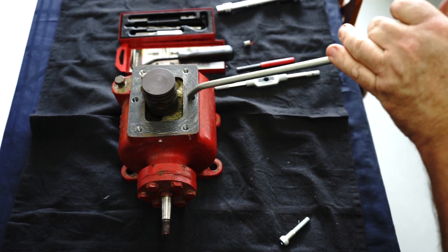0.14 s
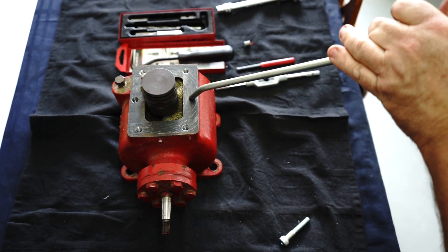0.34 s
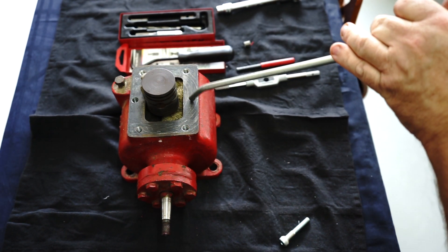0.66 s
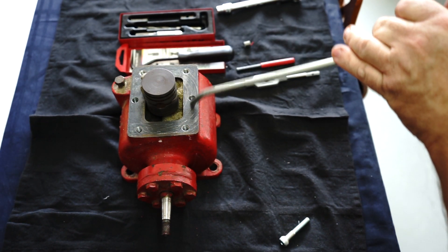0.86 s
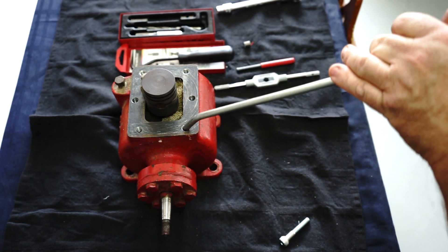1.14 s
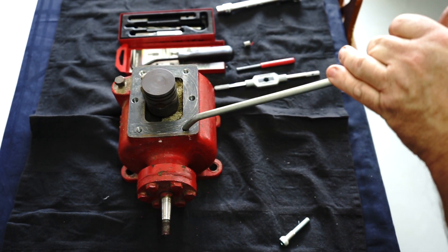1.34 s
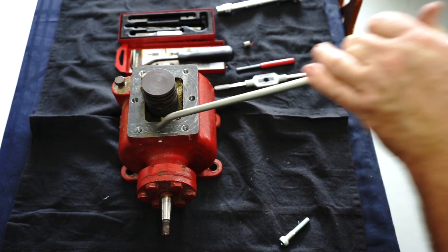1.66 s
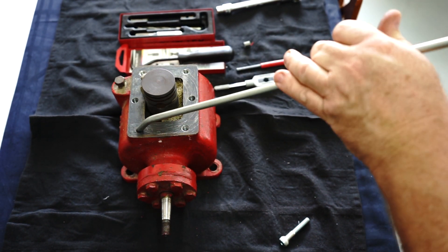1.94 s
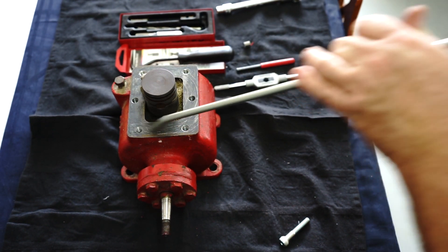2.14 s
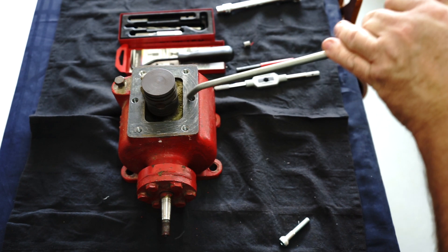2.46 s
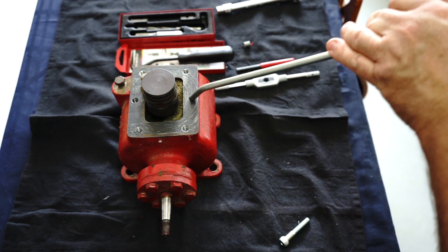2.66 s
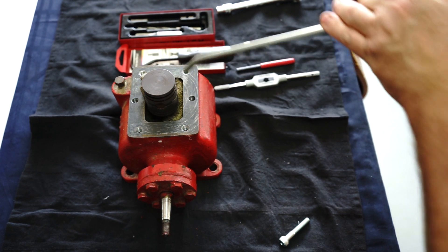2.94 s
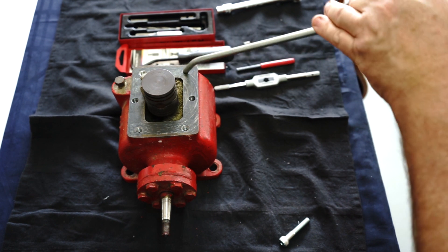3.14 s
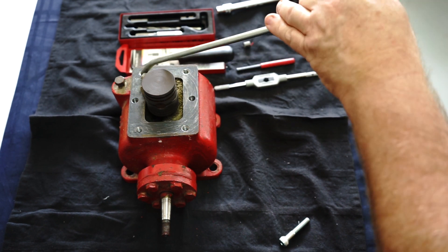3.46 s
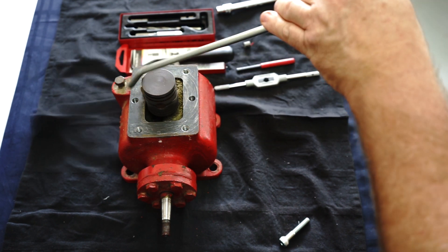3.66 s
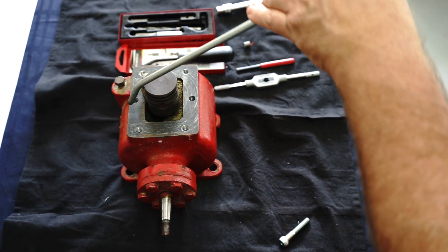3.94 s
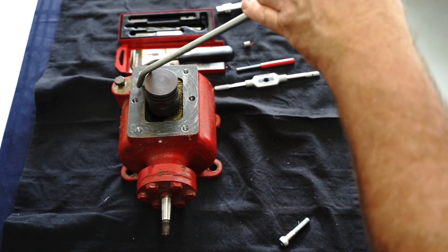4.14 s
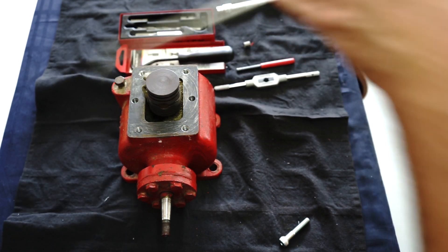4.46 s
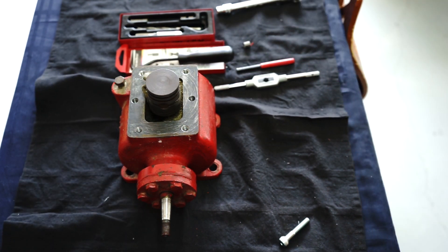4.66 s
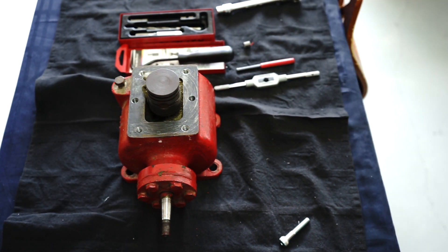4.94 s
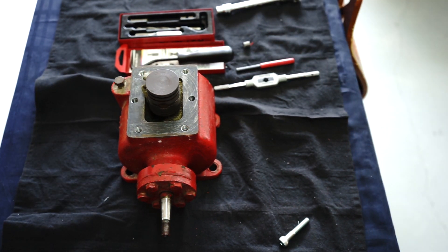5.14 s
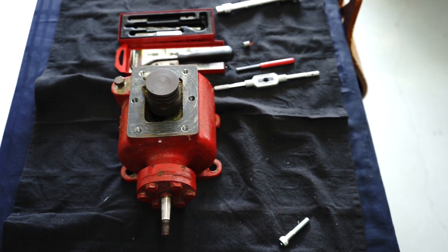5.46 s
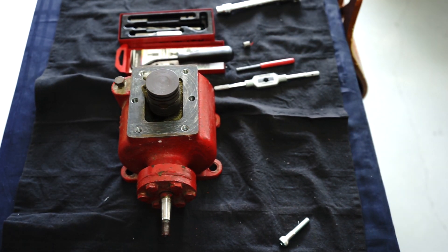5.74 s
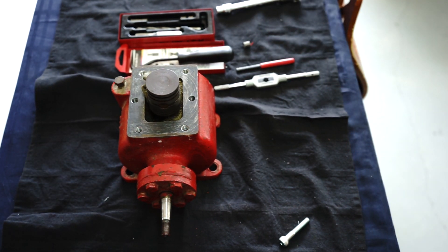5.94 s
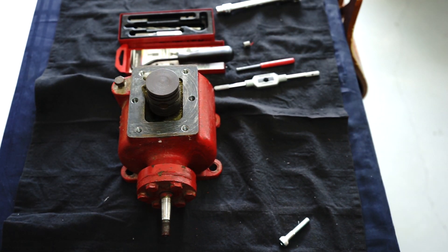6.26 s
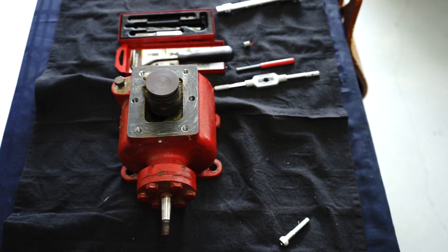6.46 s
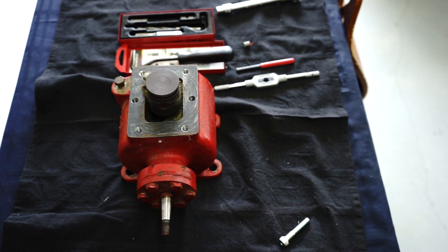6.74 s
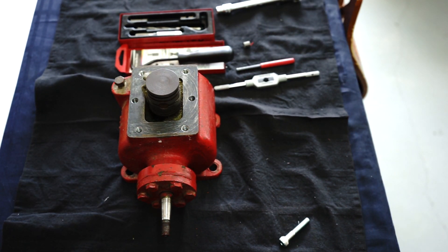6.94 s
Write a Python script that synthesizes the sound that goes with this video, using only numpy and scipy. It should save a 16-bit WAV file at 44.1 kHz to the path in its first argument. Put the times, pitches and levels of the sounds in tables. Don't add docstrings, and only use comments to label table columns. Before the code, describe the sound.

Fierce, fluttering air blasts whistle and roar across metal openings in a hard-walled workshop, followed by quiet cloth rustle, hose groans and faint knocks.

```python
import sys
import numpy as np
from scipy import signal
from scipy.io import wavfile
from scipy.ndimage import uniform_filter1d

SR = 44100
rng = np.random.default_rng(int(sys.argv[2]) if len(sys.argv) > 2 else 0)


def generate_wav(sig):
    pcm = np.round(np.clip(np.atleast_2d(sig).T, -1, 1) * 32767).astype(np.int16)
    wavfile.write(sys.argv[1], SR, pcm)


def volts_from_decibels(level):
    exponent = np.asarray(level, float) / 20
    return 10 ** exponent


N = 312916
BLOWING = int(4.5 * SR)
MOVE_S = 0.0161

# start_s, length_s, first_hz, last_hz, peak_db
CHIRPS = [
    (0.075, 0.031, 4350, 4715, -11.5),
    (0.887, .058, 4960, 3920, -7.5),
    (1.077, 0.024, 4090, 4520, -11),
    (1.731, .066, 4200, 5107, -5.5),
    (2.147, 0.044, 5044, 4060, -4.5),
    (2.964, .036, 4055, 4270, -16.5),
    (3.294, 0.039, 4210, 4500, -8.5),
    (3.598, 0.022, 4450, 4050, -17.5),
    (4.074, 0.028, 4408, 4460, -19),
]


def rms_one(x):
    return x / np.sqrt(np.mean(x ** 2) + 1e-20)


def in_time(rows, size=N):
    s, *columns = np.transpose(rows)
    t = np.arange(size) / SR
    return [np.interp(t, s, c) for c in columns]


def at_hz(points, hz):
    points_hz, values = np.array(points).T[:2]
    return np.interp(np.log(hz), np.log(points_hz), values)


def drift(rate_hz, size=N):
    settle = 4000
    r = np.exp(-2 * np.pi * rate_hz / SR)
    wander = signal.lfilter([1], [1, -2 * r, r * r], rng.standard_normal(size + settle))
    return rms_one(wander[settle:])


def ring(clicks, hz, t60):
    r = volts_from_decibels(-60 / (max(t60, .002) * SR))
    w = 2 * np.pi * hz / SR
    return signal.lfilter([0, np.sin(w)], [1, -2 * r * np.cos(w), r * r], clicks + 1e-18)


def bank(gain, size=N):
    # pitch_hz, side_minus_mid_db
    spread = [(60, -8.5), (180, -23.5), (550, -20), (1650, -11.5), (5000, -3), (15000, -8.5)]
    # pitch_hz, left_minus_right_db
    tilt = [(60, 0), (240, -1), (950, -1.5), (3770, -2), (15000, 1.5)]
    edges_hz = np.geomspace(28, 17500, 20)
    out, white = 0, rng.standard_normal((2, 2, size))
    for k, (low, high) in enumerate(zip(edges_hz, edges_hz[1:])):
        band = signal.butter(2, [low, high], "band", fs=SR, output="sos")
        mid, side = signal.sosfilt(band, white[k % 2])
        hz = np.sqrt(low * high)
        side = side * volts_from_decibels(at_hz(spread, hz))
        lean = volts_from_decibels(at_hz(tilt, hz) / 2)
        out = out + gain(hz) * np.array([lean * (mid + side), (mid - side) / lean])
    return out


def narrow(hz, width_hz, steady=0., size=N):
    carrier = np.exp(2j * np.pi * np.cumsum(hz * np.ones(size)) / SR)
    wander = drift(width_hz, size=size) + 1j * drift(width_hz, size=size)
    return rms_one(np.real(carrier * (steady + wander)))


def gate(s, length, size=BLOWING):
    hold = max(length, MOVE_S)
    corners_s = s - MOVE_S / 2 + np.array([0, MOVE_S, hold, hold + MOVE_S])
    return np.interp(np.arange(size) / SR, corners_s, [0, 1, 1, 0])


def valve(x):
    opening = np.interp(np.arange(BLOWING) / SR, [4.41, 4.46], [1, 0])
    return np.pad(x * opening, [(0, 0), (0, N - BLOWING)])


def nozzle():
    # time_s, hiss_db
    flow = [(0, -21), (.3, -17.5), (.85, -15), (1.2, -18), (1.3, -17.5), (1.38, -22), (1.5, -16.5),
            (1.9, -18.5), (2.07, -26.5), (2.14, -24.5), (2.55, -22), (2.8, -21), (3.2, -22), (3.6, -20.5),
            (3.64, -26.5), (3.95, -25), (4.44, -25)]
    # start_s, length_s, relative hiss_db, relative roar_db, drone_db
    dips = [(0.0, 0.49, -0.14, 3, -62.5), (0.046, 0.14, -6.5, 4.5, -45), (0.634, 0.063, -2.6, 4.5, -44),
            (0.887, .23, -12.5, 2.9, -44.5), (1.563, .17, -6.5, 4.5, -46),
            (1.745, 0.082, -12.5, -5.5, -41.5), (1.83, 0.14, -2.2, 0.1, -53.5),
            (2.116, 0.047, -1.2, 2.2, -41), (2.156, 0.37, -11, -6, -49.5), (2.211, 0.11, 3.3, 9, -57.5),
            (2.445, 0.071, 0.5, 12, -69), (2.722, .1, -2, -1, -60), (2.857, .19, -4.5, 4.5, -53.5),
            (3.111, 0.034, -5.5, -3, -58), (3.202, .06, -2.5, -1, -52), (3.314, .025, -2.5, -15, -41),
            (3.372, 0.054, -4.5, -1, -60), (3.577, 0.039, -2.7, 0.5, -50), (3.687, 0.28, 1.3, 6, -62),
            (3.986, 0.32, -3.5, 1.5, -53), (4.328, 0.084, -1.8, 4.4, -51)]
    # start_s, length_s, relative hiss_db, relative splash_db
    splashes = [(0.0, .05, 1.1, 8.5), (0.183, 0.033, 0.5, 8), (0.497, 0.058, -0.8, 3.5),
                (0.631, 0.073, 2, 3), (2.102, 0.061, 4, 5.5), (2.193, 0.036, 2.2, 7), (2.45, 0.059, 2.5, 0),
                (2.511, 0.065, 3, 7), (2.657, 0.039, 4, 1.5), (2.837, 0.029, 4.5, 1.5),
                (2.921, 0.078, 2, 3), (3.062, 0.023, 3, 12), (3.177, 0.033, 5, -2.5),
                (3.271, 0.033, -0.8, 9.5), (3.342, .1, -0.5, 10), (3.712, .26, -0.4, 3),
                (4.057, 0.034, -0.5, 14.5), (4.296, 0.027, 0, 13)]
    usual_splash_db, splash_spared = -7, 0.45
    usual_roar_db, roar_follows = -35, .3

    flow_db, = in_time(flow, size=BLOWING)
    muffle_db, swell_db, drone = sum(gate(s, n) * np.array([[hiss_db], [roar_db], [volts_from_decibels(drone_db)]])
                                     for s, n, hiss_db, roar_db, drone_db in dips)
    lift_db, splash_db = sum(gate(s, n) * np.array([[hiss_db], [edge_db]])
                             for s, n, hiss_db, edge_db in splashes)
    hiss_db = flow_db + muffle_db + lift_db
    splash_db = usual_splash_db + splash_db - splash_spared * muffle_db
    roar_db = usual_roar_db + roar_follows * (flow_db - flow_db.mean()) + swell_db - hiss_db
    return hiss_db, splash_db, roar_db, drone


def jet():
    zones_hz = [11000, 6200, 1800, 600]
    # pitch_hz, level_db per Hz
    jet_colour = [(30, -44.5), (59, -33), (168, -40), (330, -22), (800, -20), (3230, -10), (5310, -0.5),
                  (15500, 0.74)]
    drone_hz, drone_width_hz = 310, 79

    hiss_db, splash_db, roar_db, drone = nozzle()
    roar_shift_db = roar_db + 15.0
    cloth_db = 5.4 * gate(3.68, 0.3)
    bass_shift_db = 1.115 * roar_shift_db - 4.5 + cloth_db
    shifts_db = [0, splash_db + 4.5, roar_shift_db, bass_shift_db]
    gust = drift(9.0, size=BLOWING)
    flutter = [drift(27.0, size=BLOWING), drift(26.0, size=BLOWING)]

    def gain(hz):
        place = np.interp(-np.log(hz), -np.log(zones_hz), np.arange(4))
        k = min(int(place), 2)
        shift_db = (k + 1 - place) * shifts_db[k] + (place - k) * shifts_db[k + 1]
        unrest_db = 0.99 * gust + 2.0 * flutter[int(hz) % 2]
        return volts_from_decibels(at_hz(jet_colour, hz) + hiss_db + shift_db + unrest_db)

    drone = drone * volts_from_decibels([[-.8], [.8]]) * volts_from_decibels(2.2 * drift(10.5, size=BLOWING))
    middle = narrow(drone_hz, drone_width_hz, size=BLOWING)
    sides = narrow(drone_hz, drone_width_hz, size=BLOWING) * [[1], [-1]]
    drone *= middle + .3 * sides
    return valve(volts_from_decibels(6.5) * bank(gain, size=BLOWING) + drone)


def column(rows, width_hz):
    t = np.arange(BLOWING) / SR
    starts, _, pitches = np.transpose(rows)[:3]
    row = np.maximum(np.searchsorted(starts, t + MOVE_S / 2) - 1, 0)
    hz = uniform_filter1d(pitches[row], size=500)
    level = sum(gate(s, n) * volts_from_decibels(np.interp(t, [s, s + n], [first_db, last_db]))
                for s, n, _, first_db, last_db in rows)
    middle = narrow(hz, width_hz, size=BLOWING)
    sides = narrow(hz, width_hz, size=BLOWING) * [[1], [-1]]
    return level * (middle + 0.5 * sides)


def hole():
    # start_s, length_s, pitch_hz, first_db, last_db
    roars = [(0.0, .06, 4700, -16, -27), (.06, 0.15, 4580, -18, -21.5), (.2, 0.019, 4710, -21.5, -23),
             (.89, 0.17, 4500, -21.5, -18.5), (1.1, 0.059, 4405, -16.5, -23.5),
             (1.2, 0.11, 8660, -18.5, -22), (1.43, .11, 8600, -15, -19), (1.57, 0.058, 4220, -21, -29.5),
             (1.625, 0.13, 4382, -13, -17), (1.79, 0.15, 4744, -20.5, -25), (2.18, 0.1, 4540, -15, -22.5),
             (2.44, 0.028, 4450, -16.5, -28.5), (2.51, 0.055, 4725, -15, -21),
             (2.89, .14, 4340, -18.5, -20.5), (3.055, 0.031, 4715, -10.5, -34),
             (3.245, .115, 4372, -13, -15.5), (3.36, 0.076, 5350, -11, -23.5),
             (3.595, 0.047, 4250, -21, -25), (4.03, .07, 4870, -22, -19), (4.11, .17, 4543, -24, -26),
             (4.295, 0.096, 5120, -12.5, -30)]
    # start_s, length_s, pitch_hz, first_db, last_db
    clear_notes = [
        (.06, 0.12, 4540, -15.5, -26.5),
        (.93, 0.13, 4600, -21, -28),
        (1.1, 0.05, 4460, -12.5, -30),
        (1.69, 0.045, 4270, -12.5, -9),
        (1.79, .12, 5102, -9, -19),
        (2.18, 0.18, 4910, -13, -32),
        (2.93, .04, 4097, -28.5, -22),
        (4.08, .11, 4500, -24, -35),
        (4.33, 0.083, 4623, -28, -27),
    ]
    yielding_db = -5.0 * sum(gate(s, n) for s, n, *_ in CHIRPS)
    level = volts_from_decibels(-3.5 + yielding_db + 1.4 * drift(30.0, size=BLOWING))
    return valve(level * (column(roars, width_hz=510.0) + column(clear_notes, width_hz=95)))


def chirps():
    # peak place (share of length), start_db, end_db, glide power
    going_in, coming_out = (0.07, -1, -16.5, 1.5), (0.57, -8.5, -4, 1)
    out, t = np.zeros(N), np.arange(N) / SR
    fray_hz = 50.0 * drift(200.0)
    wobble = 1.7 + .65 * drift(80.0)
    for s, length, first_hz, last_hz, peak_db in CHIRPS:
        peak, start_db, end_db, power = going_in if last_hz < first_hz else coming_out
        span = slice(int(s * SR) + 1, int((s + length) * SR))
        u = (t[span] - s) / length
        hz = first_hz + (last_hz - first_hz) * u ** power + fray_hz[span]
        phase = 2 * np.pi * np.cumsum(hz) / SR
        edges = np.clip(np.minimum(u, 1 - u) * length / 0.001, 0, 1)
        level = volts_from_decibels(peak_db + np.interp(u, [0, peak, 1], [start_db, 0, end_db]))
        out[span] += level * edges * (np.sin(phase) + volts_from_decibels(-23.0) * np.sin(2 * phase))
    return out * wobble * volts_from_decibels(2.0)


def shop(x):
    # pitch_hz, t60_s
    shop_t60 = [(100, 1), (1000, 0.55), (5000, 0.46), (14000, 0.29)]
    t = np.arange(SR // 2) / SR
    echoes = bank(lambda hz: volts_from_decibels(-60 * t / at_hz(shop_t60, hz)), size=len(t))
    echoes = echoes * np.clip(t / .003, 0, 1)
    echoes /= np.sqrt(np.sum(echoes ** 2) / 2)
    return signal.fftconvolve(x[None], echoes, axes=1)[:, :N]


def background():
    # pitch_hz, level_db per Hz
    room_tone = [(15, -35), (25, -6), (60, 2.5), (309, -7), (3180, -21), (4370, -16), (5540, -18.5),
                 (14000, -26)]
    # time_s, level_db
    handling = [
        (4.65, -77),
        (4.8, -64.5),
        (5.15, -70),
        (5.96, -72),
        (6.33, -69),
        (6.43, -46.5),
        (6.56, -67.5),
        (6.84, -46.5),
        (7.09, -52),
    ]
    air_db = -53
    rumble_level_db, rumble_lag_s = -2.5, 0.24
    leak_hz, leak_width_hz, leak_db, leak_ends_s = 4350, 140, -76.5, 6.5
    hum_hz, hum_width_hz, hum_db, hum_turn_s = 61.5, 10.5, -66, 1.45

    masked = 4 * SR
    rustle_db = in_time(handling)[0][masked:]
    lag = int(rumble_lag_s * SR)
    rumble_db = rumble_level_db + uniform_filter1d(rustle_db, size=2 * lag, origin=lag - 1)
    patchy = drift(5.4, size=N - masked)

    def gain(hz):
        rumble = np.interp(np.log(hz), np.log([250, 500]), [1, 0])
        still = np.interp(np.log(hz), np.log([2000, 4000]), [0, 1])
        rustle = 1 - rumble - still
        level_db = rumble * (rumble_db + 21.5) + rustle * (rustle_db + 22.5) + still * air_db
        return volts_from_decibels(at_hz(room_tone, hz) + level_db + 1.0 * patchy)

    t = np.arange(N) / SR
    bleeding = np.interp(t, [leak_ends_s - .2, leak_ends_s + 0.11], [1, 0])
    leak = volts_from_decibels(leak_db) * narrow(leak_hz, leak_width_hz) * bleeding
    running = np.interp(t, [hum_turn_s, hum_turn_s + .2], [1, 0])
    hum = volts_from_decibels(hum_db) * narrow(hum_hz, hum_width_hz, steady=1.5) * running
    room = np.pad(bank(gain, size=N - masked), [(0, 0), (masked, 0)])
    return room + leak + hum


def knocks():
    # start_s, ring_hz, thud_db, clack_db, tick_db
    blows = [(4.734, 585, -71, -58, -75.5), (5.124, 395, -64, -70.5, -79.5), (5.589, 450, -79, -75, -81.5),
             (6.122, 399, -76.5, -74, -57), (6.152, 400, -53.5, -61, -76), (6.194, 346, -76, -74, -65),
             (6.229, 623, -66.5, -60.5, -76), (6.367, 602, -43, -46.5, -59), (6.404, 640, -43, -70.5, -58),
             (6.657, 1193, -46, -36.5, -38.5), (6.733, 326, -47, -53, -51), (6.808, 330, -33.5, -32, -55),
             (6.901, 739, -33, -35, -47.5), (7.049, 204, -49, -48, -53)]
    # pitch_hz, level_db, t60_s
    gun_modes = [(1200, -5.5, .02), (2900, 6, .02), (3900, -2, .006), (5300, -2.5, .004), (7700, 1.5, .006),
                 (8500, -3, .006)]
    # pitch_hz, level_db, t60_s
    bench_modes = [(145, -19, .5), (415, -18, .6), (578, -2.5, .35), (619, -2, .28), (715, -2, .24),
                   (947, -4, .26), (1190, -13, .4)]
    out, ticks, thumps = np.zeros((3, N))
    t = np.arange(SR // 2) / SR
    noise = rng.standard_normal((len(blows), len(t)))
    ranges_hz = [150, 1300], [1000, 4560], [6700, 9200]
    thud, clack, tick = (signal.butter(2, e, "band", fs=SR, output="sos") for e in ranges_hz)
    for (s, ring_hz, thud_db, clack_db, tick_db), n in zip(blows, noise):
        lasting = np.interp(max(clack_db, thud_db), [-58, -46], [.15, 1])
        crack = 1 + 1.95 * volts_from_decibels(-60 * t / 0.012)
        blow = volts_from_decibels(thud_db - 0.5) * np.sin(2 * np.pi * ring_hz * t) * volts_from_decibels(-60 * t / 0.18)
        blow += volts_from_decibels(thud_db + 9.5) * signal.sosfilt(thud, n * crack * volts_from_decibels(-60 * t / 0.5))
        blow += volts_from_decibels(clack_db + 4.5) * signal.sosfilt(clack, n * crack * volts_from_decibels(-60 * t / 0.33))
        blow += volts_from_decibels(tick_db + 9.0) * signal.sosfilt(tick, n * volts_from_decibels(-60 * t / (0.2 * lasting)))
        rattle = volts_from_decibels(tick_db - 26.5) * n * volts_from_decibels(-60 * t / (0.364 * lasting))
        at = round(s * SR)
        out[at:at + len(t)] += blow[:N - at]
        ticks[at:at + len(t)] += rattle[:N - at]
        thumps[at] = volts_from_decibels(thud_db - 9.0)
    steel = sum(volts_from_decibels(level_db) * ring(ticks, hz, t60) for hz, level_db, t60 in gun_modes)
    bench = sum(volts_from_decibels(level_db) * ring(thumps, hz, min(t60, .6)) for hz, level_db, t60 in bench_modes)
    return out + steel + bench


def groans():
    # start_s, pitch_hz, level_db, length_s
    drags = [(4.77, 1800, -69.5, .24), (4.883, 239, -67, .13), (4.88, 121.5, -73, .12),
             (5.032, 240, -68, .12), (5.14, 135, -71, .07), (5.97, 216, -76, .1), (6.549, 232, -57, .14),
             (6.662, 126, -51, .18), (6.81, 191, -51, .13), (6.9, 148, -49.5, .2), (5.03, 660, -70, .15),
             (5.04, 420, -69, .16), (5.53, 380, -73, .1), (5.94, 1200, -77, .12), (6.14, 1650, -73, .22),
             (6.368, 2000, -62, .16)]
    out, wobble = np.zeros(N), 1 + .5 * drift(33.0)
    wander = np.cumsum(drift(144.0)) / SR
    for s, hz, level_db, length in drags:
        at = round(s * SR)
        t = np.arange(int(length * SR)) / SR
        shiver = (.035 + 22 / hz) * np.roll(wander, -at)[:len(t)]
        swell = volts_from_decibels(level_db + 5.5) * np.sin(np.pi * (t / length) ** 0.39)
        groan = swell * np.sin(2 * np.pi * hz * (t + shiver))
        out[at:][:len(t)] += groan[:N - at]
    return out * wobble


def scene():
    air, whistle, blows = jet() + hole(), chirps(), knocks() + groans()
    wet = volts_from_decibels(-9.0) * air.mean(axis=0) + volts_from_decibels(-14.0) * whistle + volts_from_decibels(-6.0) * blows
    placed_blows = np.array([np.roll(blows, 7), blows]) * volts_from_decibels([[-.8], [.8]])
    return volts_from_decibels(-1.5) * (air + whistle) + placed_blows + shop(wet) + background()


def low_pass(x):
    return signal.sosfilt(signal.butter(12, 16050, fs=SR, output="sos"), x)


def record(dry):
    power = uniform_filter1d(np.mean(dry ** 2, axis=0), size=220)
    thump = signal.sosfilt(signal.butter(2, [45, 160], "band", fs=SR, output="sos"), power)
    fall_db = 260.0 * np.arange(N) / SR
    over_db = np.maximum(10 * np.log10(power + 1e-12) + 11.86, 0)
    held_db = np.maximum.accumulate(over_db + fall_db) - fall_db
    held = dry * volts_from_decibels(-.7 * uniform_filter1d(held_db, size=220)) + volts_from_decibels(-27.0) * thump
    held = 1.304 * np.tanh(held / 1.192)
    held = signal.sosfilt(signal.cheby2(18, 60, 16150, fs=SR, output="sos"), held)
    held = signal.sosfilt(signal.butter(2, 55, "high", fs=SR, output="sos"), held)
    held[1] = signal.lfilter([.3, 1], [1, .3], held[1])
    return low_pass(held)


dry = scene()
out = record(dry)
generate_wav(out)
```